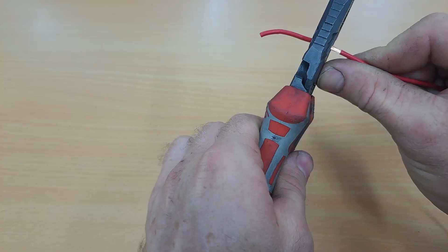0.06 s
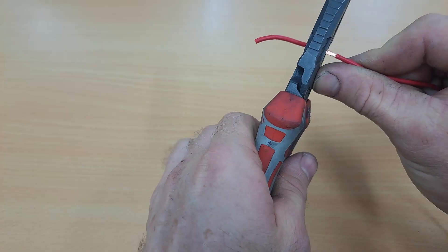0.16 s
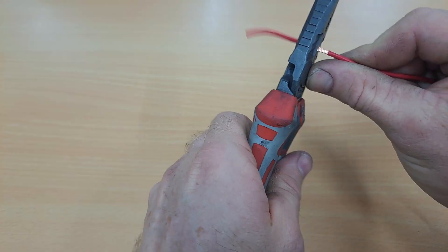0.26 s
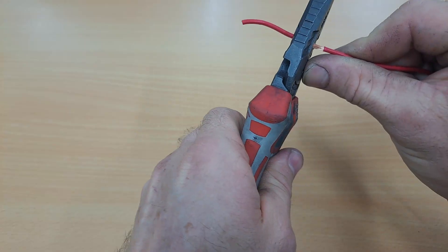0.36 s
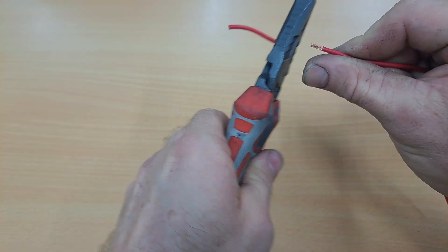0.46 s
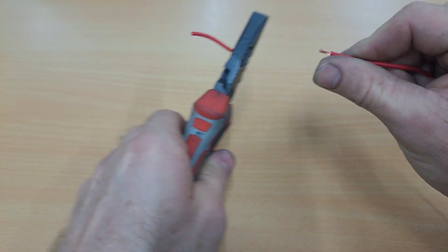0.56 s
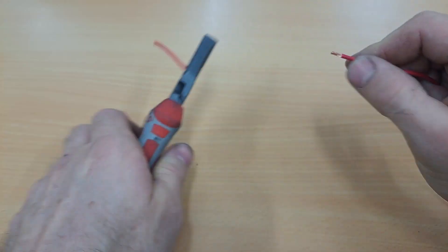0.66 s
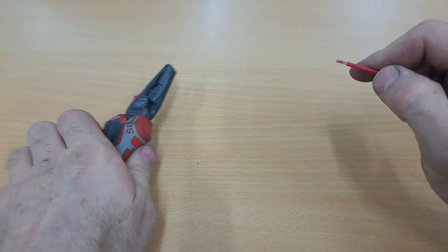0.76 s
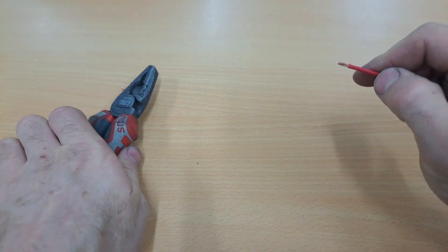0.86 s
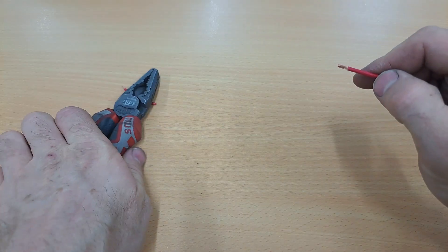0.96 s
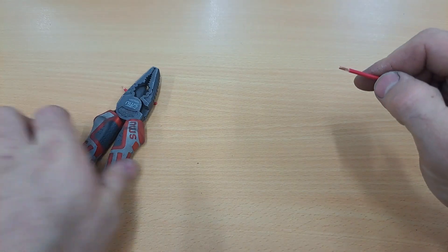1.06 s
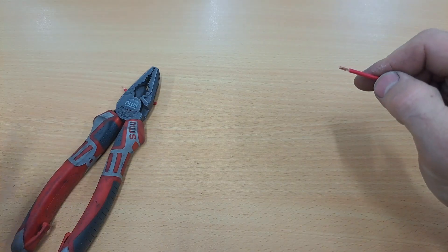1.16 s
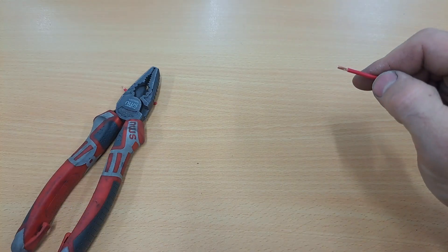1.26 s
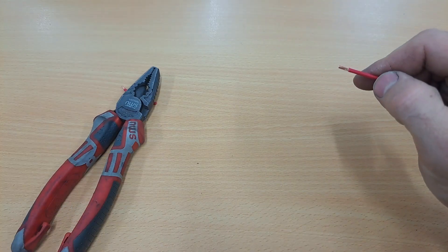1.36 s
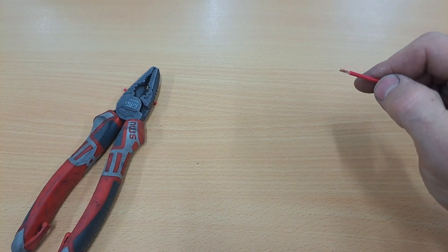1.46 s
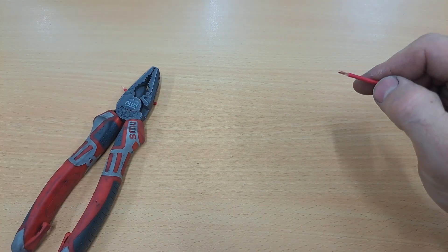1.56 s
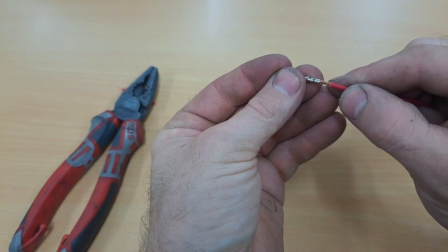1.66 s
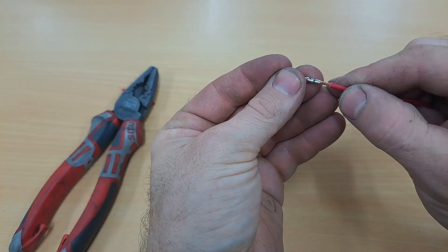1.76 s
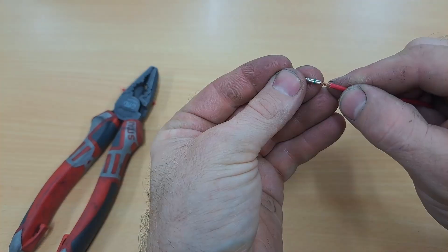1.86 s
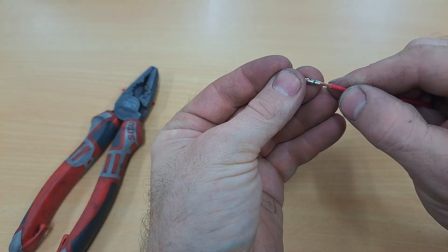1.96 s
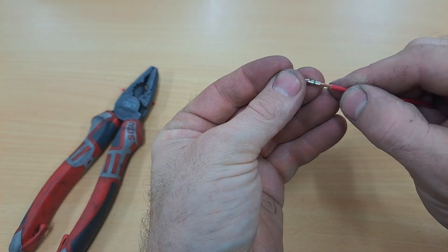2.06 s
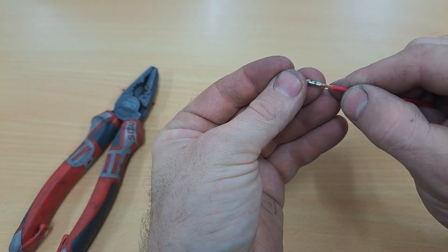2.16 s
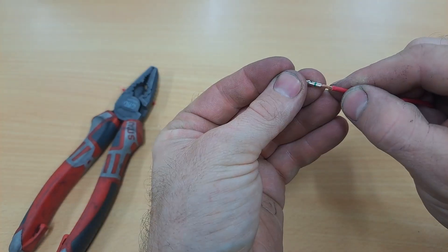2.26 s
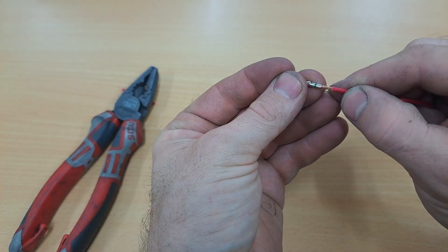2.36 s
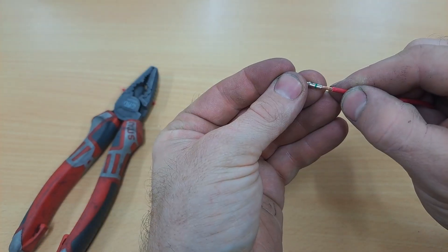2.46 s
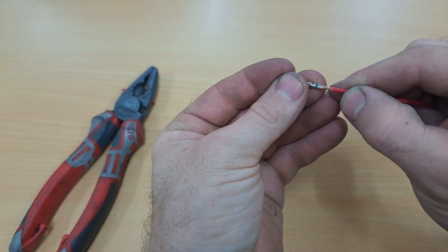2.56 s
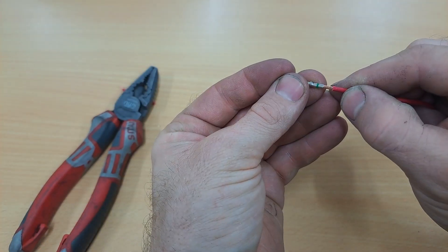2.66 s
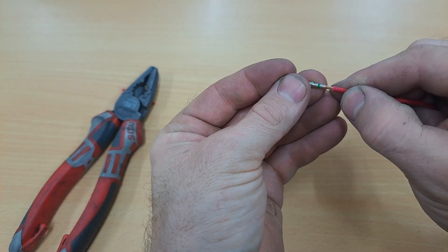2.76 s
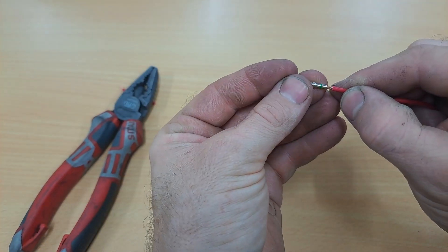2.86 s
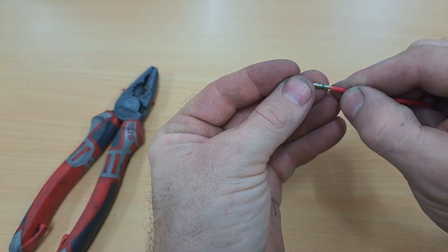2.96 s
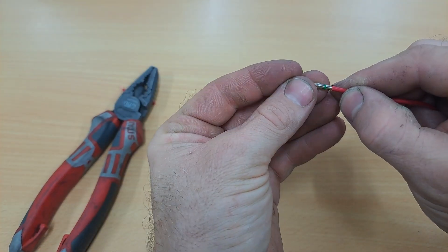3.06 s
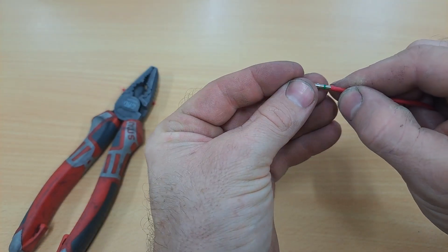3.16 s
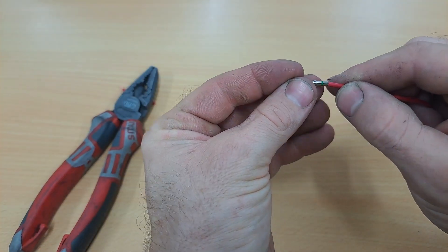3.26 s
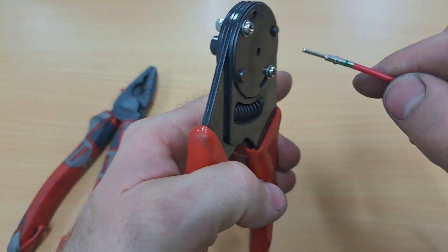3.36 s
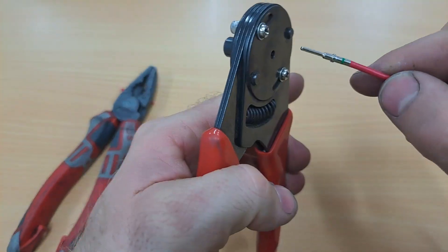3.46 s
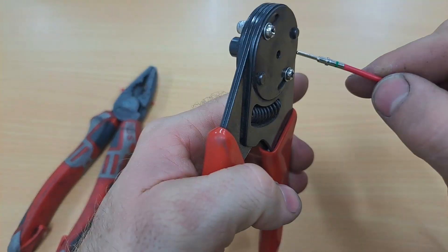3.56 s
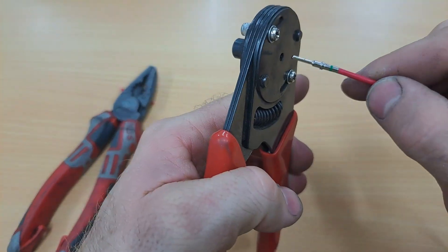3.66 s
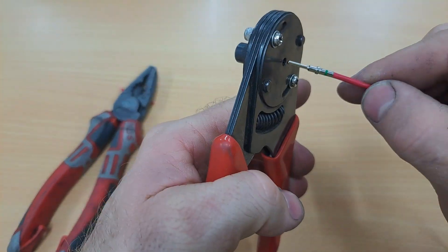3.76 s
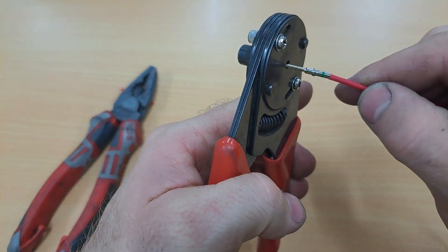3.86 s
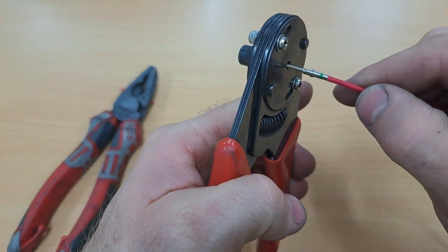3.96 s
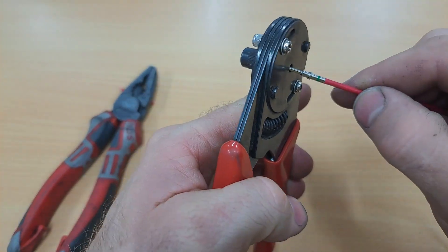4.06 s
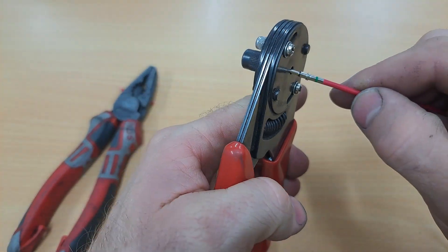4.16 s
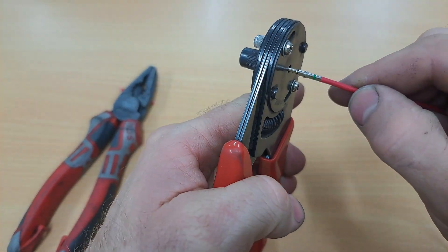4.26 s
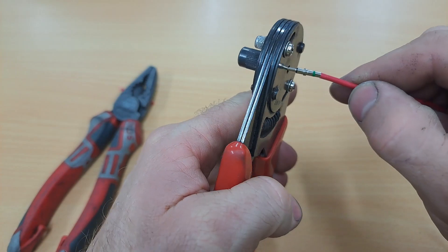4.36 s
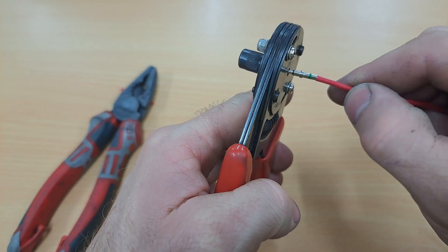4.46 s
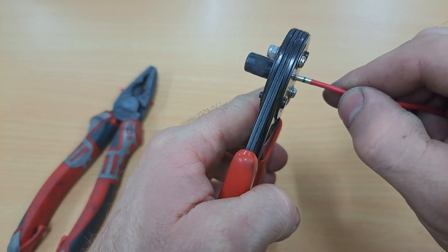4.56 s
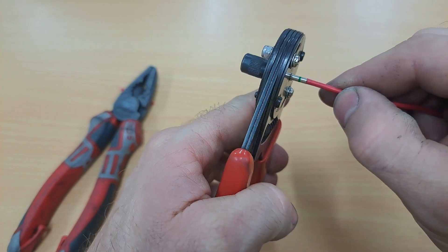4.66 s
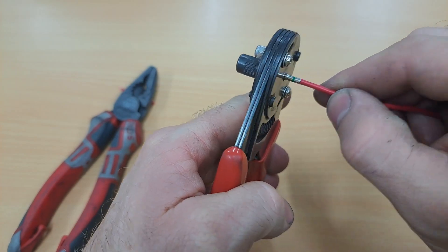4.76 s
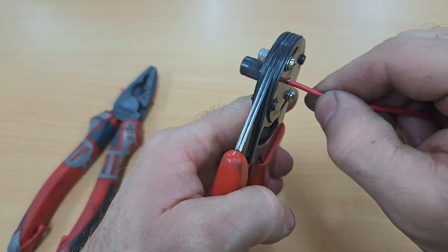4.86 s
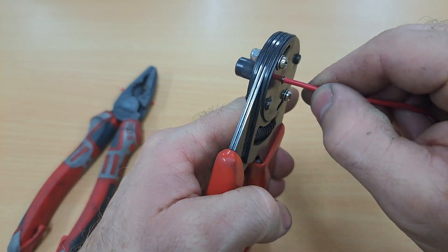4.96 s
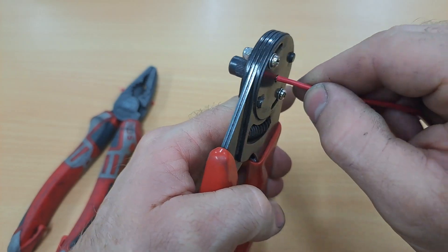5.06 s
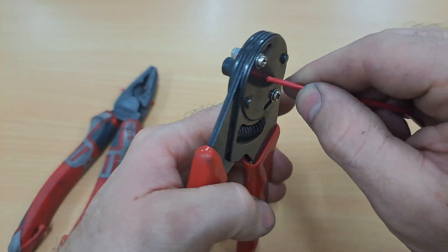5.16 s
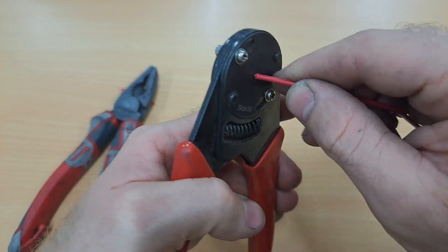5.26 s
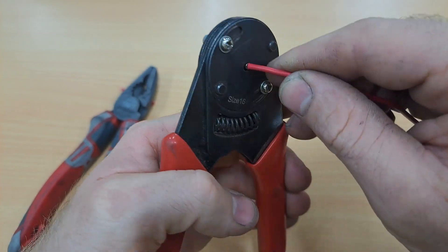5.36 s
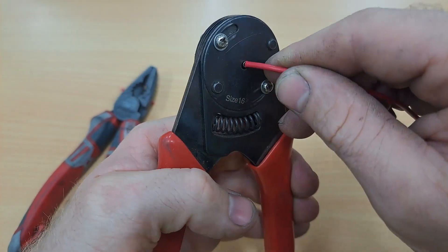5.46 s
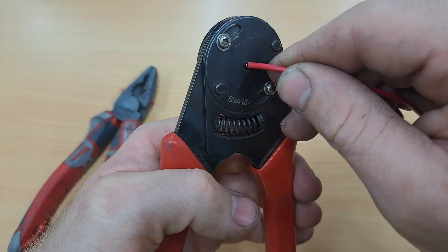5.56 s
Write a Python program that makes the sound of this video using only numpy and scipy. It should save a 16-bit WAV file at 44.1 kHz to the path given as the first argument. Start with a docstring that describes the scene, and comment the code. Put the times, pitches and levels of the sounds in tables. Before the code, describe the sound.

A steady low ventilation rumble and a faint hiss run throughout, heard through a close microphone in a bare workshop with a short echo. At about 0.3 seconds, pliers bite through wire insulation with a sharp metallic snap, and the bared strands shiver very faintly. Light ticks and rubbing follow around 0.8 seconds. From 1.0 to 1.1 seconds the pliers land on a wooden bench with a quick cluster of knocks and a metal clack, the loudest moment. Only room tone continues until about 3.4 seconds, when very faint metal scraping begins. From around 4.1 seconds a ratchet crimper ticks shut on a pin, with crisp clicks near 4.4 and 4.6 seconds and lighter ones around 4.9. A sharp click at 5.1 seconds releases it, its spring trembles briefly, and soft rubbing and small ticks trail off by about 5.6 seconds.

```python
"""Pliers and crimper at the workbench

Close up, pliers bite through wire insulation, the bared strands shiver, and the tool knocks down on a
wooden bench. Later a ratchet crimper ticks shut on a pin and its spring trembles on release. Cracks and
rubbing ring the metal of each tool. The microphone is a phone standing close by, with two unlike ports
and a faint hiss; all around, ventilation rumbles in a bare, echoing workshop."""
import sys
import numpy as np
from scipy import signal
from scipy.fft import rfft, irfft, next_fast_len
from scipy.io import wavfile
from scipy.ndimage import uniform_filter1d, minimum_filter1d

SR = 44100
rng = np.random.default_rng(int(sys.argv[2]) if len(sys.argv) > 2 else 0)


def wrap_up_sound(samples):
    """Save the sound to the file named by the first command line argument, as 16-bit audio."""
    columns = np.atleast_2d(samples).T
    # keep every value between -1 and 1, then stretch to whole-number steps
    tamed = np.clip(columns, -1, 1)
    steps = np.round(tamed * 32767).astype(np.int16)
    wavfile.write(sys.argv[1], SR, steps)


N = 247401

# Spectra of the phone's hiss and the ventilation. Each row: frequency in Hz, relative level in dB.
HISS_SPECTRUM = [(1760, -28.5), (3000, -40.5), (3330, -28), (3600, 3), (6570, 2), (7300, 4.5), (9500, -1),
                 (12000, 6), (14000, 7.5), (15500, 5), (15900, -1.5), (16150, -30)]
VENT_SPECTRUM = [(13, -64.5), (22, -37.5), (35, -24.5), (48, -3), (65, -5.5), (87, -9), (125, -0.5),
                 (191, -5.5), (263, -3.5), (362, -14), (810, -23), (980, -28), (1320, -31.5), (1890, -35),
                 (2500, -45), (3000, -58), (3500, -60), (4550, -100.5), (7700, -120)]
# The room. Each row: frequency in Hz, time to fade 60 dB in seconds, echo level in dB.
ROOM_DECAY = [(100, 0.36, -7.5), (310, 0.64, -7.5), (730, 0.46, 4), (1170, 0.97, 6.5), (1944, 0.87, 1.5),
              (3000, 0.46, 1), (4900, 0.88, -17), (7200, 0.66, -20), (9070, 1, -16.5), (12300, .4, -16.5),
              (14440, 0.29, -14.5), (16010, 0.314, -21)]
# Sound from all sides at the two ports. Each row: frequency in Hz, correlation.
PORT_LIKENESS = [(60, 1), (130, 0.97), (290, 0.88), (640, 0.11), (1410, -0.15), (3100, 0.16),
                 (6820, -0.034), (15000, 0.043)]
# Its balance. Each row: frequency in Hz, left minus right in dB.
PORT_BALANCE = [(60, -2), (110, -2), (200, -2), (380, -4), (700, -3.5), (1290, -5.5), (2380, -5),
                (4400, -8), (8120, -2.5), (15000, -3.5)]
# The ports at close range. Each row: frequency in Hz, left gain in dB, right gain in dB.
PORT_RESPONSE = [(102, -7.5, -6.5), (580, 2, 5), (1594, 10.5, 5), (3000, 1, 12), (5580, -22, -5),
                 (8900, -3, 0), (10390, 3, -16), (12600, -10, -4), (15580, -2.5, -10.5)]
# Modes of the wooden top. Each row: frequency in Hz, level in dB, time to fade 60 dB in seconds.
WOOD_MODES = [(117.3, 4, 0.19), (137.8, -8, 0.34), (203, -3.5, 0.12), (289.7, -14, 0.18), (323.6, 4, 0.043),
              (387, -4.5, 0.0633), (467, -4.5, 0.032), (556.4, -11, 0.12), (642, -6.5, 0.035),
              (760, -3.5, 0.022), (857, -2.5, 0.035), (981, -1.5, 0.03), (1180, 5.5, 0.013),
              (1294, -9, 0.03), (1502, 1.5, 0.013), (1645, -1.5, 0.011), (1853, 0, 0.025),
              (2020, -6, 0.073), (2610, -5.5, 0.02255), (3947, -17.5, .01)]
# Knocks on it. Each row: start in seconds, level in dB, contact time in seconds.
BENCH_KNOCKS = [(0.3233, -17.5, 0.0026), (0.3262, -22, 0.0021), (0.3227, -46, 0.00041),
                (0.796, -40.5, 0.00018), (0.977, 0.5, 0.0029), (1.0688, 0.5, 0.0025), (1.091, 2, 0.0036),
                (1.1039, -6.5, 0.0006), (1.1064, -12, 0.00043), (1.1099, -7, 0.00083), (1.1234, -8, 0.0011),
                (1.13, -9, 0.0015)]
# Resonances of duct, wire and tools. Each row: frequency in Hz, nominal width in Hz, level in dB.
DUCT_RESONANCES = [(58, 35.6, 1.5), (116.4, 20, -1.5), (168.7, 4.7, -7.5), (210.1, 40, -14),
                   (252.9, 5.8, -3.5), (334, 110, -5.5)]
STRAND_RESONANCES = [(2144, 170, -3), (4860, 250, -11)]
SPRING_RESONANCES = [(2980, 220, -11), (5030, 400, 3), (6850, 340, 5), (12400, 620, -3)]
PLIER_RESONANCES = [(1640, 470, 2), (2200, 460, -0.5), (2747, 450, -6), (3530, 660, -6), (3995, 800, -4.5),
                    (5090, 1300, 5), (6145, 1350, 6.5), (7170, 1000, 5), (9240, 2850, -9),
                    (11440, 1410, 2.5), (12360, 3300, -2), (14630, 3000, -12)]
CRIMPER_RESONANCES = [(1310, 1300, -9), (1930, 1300, -5), (2570, 940, -5), (3630, 370, -5),
                      (3960, 930, -13.5), (5150, 1300, -6), (6170, 1600, -1.5), (7090, 1090, 2.5),
                      (9840, 2300, -10), (11400, 1200, -3.5), (12350, 1200, -0.5), (14400, 1700, -4),
                      (15430, 1300, -5.5)]
# A tool rings in six zones. Five have their own ring level, low to high, relative to the 6-9 kHz zone.
ZONE_EDGES_HZ, REFERENCE_ZONE = [3000, 4400, 6000, 9000, 13800], 3
# Fingers, wire and jaws rubbing.
# Each row: start in seconds, hold in seconds, level in dB, five ring levels in dB.
PLIER_STROKES = [(.08, 0.22, -77, -22.5, -3.5, 0, -1, -9), (.16, .01, -62.5, -8, -10.5, 0.22, -4.5, -7),
                 (.285, 0.019, -55.5, -2, -0.5, 0, -4, 7), (.345, 0.01, -52, -7.5, -34.5, 0.076, 4, 1.5),
                 (.47, 0.085, -67.5, -22, -15, 0, -10, -1), (.6, .1, -61.5, 0, -9, 0, -6, -1),
                 (.735, 0.032, -53, -22, -15, 1, -7, -1), (.81, 0.069, -57.5, 6.5, 4.5, 0, -1, 2),
                 (.88, 0.025, -60, -7, 6, 0.069, -1, -3), (.95, 0.19, -60, 4, 7, 0.029, -2.5, -8)]
CRIMPER_STROKES = [(3.38, 0.22, -77, -19, -4, -2, -9, -9), (3.62, 0.15, -80, -13.5, -0.5, 0.5, -3, -6),
                   (3.915, 0.043, -75, -15.5, -3, 11, -6, 5.5), (4.07, 0.15, -74, -19, -6, 12.5, -6, -9),
                   (4.3, 0.19, -73, -8, -3, -4, -8, -9), (4.45, 0.021, -62, -4, 1, 12, -5, 0),
                   (4.56, 0.0068, -59, -20, -3, 9, -14, -14), (4.595, 0.027, -51, -15, 5, 5, -10, -12),
                   (4.845, 0.042, -56.5, -15, -14, 9, -5, -7), (4.885, 0.032, -69, 3, 5, 0, -7, -9),
                   (4.927, 0.0076, -50, -10, -1, 7, 0, -3), (5.135, 0.055, -54.5, -14, -8, 2, -5, -7),
                   (5.185, 0.048, -61, -10, -9, 4, -7, -9), (5.225, 0.13, -63.5, -7, -9, 1.5, -7, -13),
                   (5.33, 0.15, -62.5, -8, -3, 8, -6, -8), (5.5, .15, -66, -11, -12, 4, -9, -10)]
# Metal ticks of the pliers, and of the crimper's pin and pawl.
# Each row: start in seconds, level in dB, rattle length in milliseconds, five ring levels in dB.
PLIER_CLICKS = [(.15, -44.5, 3, -12, -1.5, -4, -8.5, -8), (.168, -50.5, 2.4, 3, -7, -1.5, -4, -2),
                (.2758, -44, 2.5, -8, -4, -5.5, 1, 1), (.3055, -48, 2.4, -5, 0.5, 0.5, -3, -0.5),
                (.3229, -11.5, 5.2, -7.5, 0.5, 0.5, 4.5, -1.5), (.5327, -48, 1.5, -1, -2, 7, -2, 16),
                (.733, -48.5, 2.4, -8.5, -6, 0, 0, -6), (.7936, -24.5, 1.3, -5, -1.5, 1, -16.5, -15),
                (.8115, -36.5, 1.8, -5, 10.5, 3, -5.5, -6), (.836, -45, 1.5, -1.5, 0.5, -5, -5, -3),
                (.8523, -27.5, 1.5, -15, -6, -4, 2, 10), (.8838, -36, 1.5, -12, -2, -1, 1, 8),
                (.9, -36.5, 1.3, -9, -6, 4, -9, -3.5), (.9052, -30, 1.8, -13.5, 2, 3, -3, -8),
                (.9105, -43, 1.5, -8, -2, 0, -5, -6), (.9665, -48, 1.5, -5, -2, -3, -8, -10),
                (.9755, -47, 4, 14, -9, 2, -16, -19), (.9915, -41, 1.2, -10, -7.5, 1, -4, -10.5),
                (.9975, -31, 2.2, -7.5, 0, 2, -16, -19.5), (1.069, -53, 2.4, 2, -5.5, -2.5, -16.5, -15),
                (1.0935, -29, 2.6, -1.5, -6, -5.5, -16, -11.5), (1.1032, -17, 3, -3, 2.5, -1.5, -7.5, -10),
                (1.105, -8, 4.4, -3.5, 3, 3.5, -5, -5), (1.1075, -20, 3.5, -3.5, -5.5, 6.5, -11, -13),
                (1.127, -27.5, 4, -8.5, 1, 6, -13.5, -15.5)]
CRIMPER_CLICKS = [(3.9115, -44, 2.1, -18, -9, 7.5, -13, 6), (4.096, -47.5, 2.2, -13, -8, 1, -12, -10),
                  (4.1205, -31.5, 5.7, -12, -18, -16, -1, -11), (4.136, -46, 2.2, 0, -3, 11, -3, -9),
                  (4.147, -48, 2.2, -3, -6, 10, -6, -9), (4.182, -41, 1.8, -10, -12, -6, 1, -8),
                  (4.186, -36.5, 2.2, -12, -11, -4, -6, -4), (4.4396, -17.5, 6.5, -23, -4, -1.5, -3.5, 2),
                  (4.468, -38, 2.2, -9, -3, -1, -3, -4), (4.6005, -31, 3.4, -27, -1, 7, -7, -7),
                  (4.606, -40, 2.2, -19, -3, -3, 6, -3), (4.6162, -12, 2, -29, -6, 5, -1, -8),
                  (4.6225, -31, 0.77, -30, -5, -4, -3, 1), (4.6252, -18.5, 6.8, -21, -10, 11, 1, -3),
                  (4.631, -33, 2.8, -29, 0, 4, 2, -3), (4.841, -30.5, 2.6, -22, -19, -8, 5.5, 5),
                  (4.8495, -36, 3, -29, -11, -6, -9, -9), (4.861, -39, 5, -25, -15, -3, -7, -9),
                  (4.8724, -34, 2.8, -18, -14, 1, -2, -6), (4.9264, -30.5, 3.4, -19, -3, 9, 8.5, -3),
                  (4.9315, -32, 3.9, -21, 0, 9, 5, 7), (4.9375, -31.5, 3.5, -19, 0, 6, 1, 0),
                  (5.1206, -15, 4.8, -11.5, -9, -1, -1.5, -10), (5.293, -51.5, 1.5, -3, -1, 1, -3, -1.5),
                  (5.3275, -37, 3.8, -20, -14, -11, -3, -9), (5.417, -39, 4, -12, -5, -2, -7, -12),
                  (5.487, -51, 2.4, -8, 0, 0, -6, -9)]

PATHS = 4  # directions in which sound leaves the bench, the first two towards the ports


def undb(db):
    """Decibels to gain."""
    return 10 ** (np.asarray(db) / 20)


def along(hz, table, column=1):
    """A table read on a log-frequency axis."""
    table = np.array(table, float)
    return np.interp(np.log(np.maximum(hz, 1)), np.log(table[:, 0]), table[:, column])


def minimum_phase(gain_db):
    """Causal response for a gain in dB."""
    cepstrum = irfft(gain_db * np.log(10) / 20)
    half = len(cepstrum) // 2
    cepstrum[1:half] *= 2
    cepstrum[half + 1:] = 0
    return np.exp(rfft(cepstrum))


def resonances(hz, modes, max_q=20):
    """One steep-sided response for each mode; damping, as by a hand on a tool, caps the Q."""
    centre, width, db = np.transpose(modes)[:, :, None]
    width = np.maximum(width, centre / max_q)
    sign = (-1.) ** np.arange(len(centre))[:, None]  # opposed neighbours leave no notch between them
    return sign * undb(db) * (1j * hz * width / (centre ** 2 - hz ** 2 + 1j * hz * width)) ** 2


def zones(modes, ring_db):
    """Zone of each mode, and the levels of all six zones."""
    zone = np.searchsorted(ZONE_EDGES_HZ, np.array(modes)[:, 0])
    return zone, np.insert(ring_db, REFERENCE_ZONE, 0, axis=0)


def diffuse(count):
    """Spectra of noise from all sides: alike at both ports in the bass, nearly unrelated above."""
    hz = np.fft.rfftfreq(count, 1 / SR)
    likeness = np.clip(along(hz, PORT_LIKENESS), -.99, .99)
    mid, side = rfft(rng.standard_normal((2, count)))
    mid, side = mid * np.sqrt((1 + likeness) / 2), side * np.sqrt((1 - likeness) / 2)
    tilt_db = along(hz, PORT_BALANCE) / 2
    return hz, np.array([(mid + side) * undb(tilt_db), (mid - side) * undb(-tilt_db)])


def circuit_hiss(level_db=-81):
    """The noise floor: smooth self-noise of the phone's circuits."""
    hz, field = diffuse(N)
    noise = irfft(field * undb(along(hz, HISS_SPECTRUM)), N)
    return noise * undb(level_db) / noise.mean(axis=0).std()


def ventilation(level_db=-36, duct_db=-2.1):
    """Room tone: a steady rumble of air from all sides, coloured by the duct's resonances."""
    hz, field = diffuse(N)
    duct_lift = 1 + undb(duct_db) * abs(resonances(hz, DUCT_RESONANCES, max_q=50)).sum(axis=0)
    noise = irfft(field * undb(along(hz, VENT_SPECTRUM)) * duct_lift, N)
    return noise * undb(level_db) / noise.mean(axis=0).std()


def workshop_echo(source, first_wall_s=.005, build_up_s=.006):
    """Bare walls return a diffuse echo, each octave dying at its own rate."""
    hz, field = diffuse(SR)
    t, echo = np.arange(SR) / SR, 0
    colour = undb(along(hz, ROOM_DECAY, column=2))
    for centre in 62.5 * 2. ** np.arange(9):
        band = np.maximum(1 - abs(np.log2(np.maximum(hz, 1) / centre)), 0)
        t60 = along(centre, ROOM_DECAY)
        fade = np.exp(-np.log(1000) * t / t60) * np.sqrt(2 * np.log(1000) / (t60 * SR))
        echo = echo + irfft(field * band * colour, SR) * fade
    onset = 1 - np.exp(-np.maximum(t - first_wall_s, 0) / build_up_s)
    return signal.fftconvolve(source[None], echo * onset)[:, :N]


def bench_knocks(detune=.04, radiate_hz=160.5):
    """Smooth pushes ring the bench top; a softer contact lasts longer and leaves the high modes still."""
    out, t = np.zeros((PATHS, N + SR)), np.arange(SR // 3) / SR
    hz, db, t60 = np.transpose(WOOD_MODES)[:, :, None]
    decay = undb(db) * np.exp(-np.log(1000) * t / t60)
    for start_s, level_db, contact_s in BENCH_KNOCKS:
        push = np.sin(np.pi * np.arange(int(contact_s * SR) + 1) / (contact_s * SR)) ** 2
        # higher modes come from patches at unlike distances from the microphone, each tuned its own way
        phase = hz / 1000 * rng.standard_normal((PATHS, len(hz), 1))
        pitch = hz * (1 + detune * np.minimum(hz / 1000, 1) ** 2 * rng.standard_normal(phase.shape))
        ring = (decay * np.sin(2 * np.pi * pitch * t + phase)).sum(axis=1)
        knock = signal.fftconvolve(ring, push[None] / push.sum())[:, :len(t)]
        i = int(start_s * SR)
        out[:, i:i + len(t)] -= undb(level_db) * knock / 2
    radiation = signal.butter(2, radiate_hz, "high", fs=SR, output="sos")  # deep bass hardly moves air
    return signal.sosfilt(radiation, out[:, :N])


def shiver(modes, start_s, level_db, fade_db_per_s, rise_s=.0099):
    """Thin metal let go trembles against its seat, sounding a few narrow modes that fade."""
    t = np.arange(SR // 2) / SR
    response = resonances(np.fft.rfftfreq(len(t), 1 / SR), modes).sum(axis=0)
    tone = irfft(rfft(rng.standard_normal((PATHS, len(t)))) * response, len(t))
    envelope = undb(level_db - fade_db_per_s * t) * (1 - np.exp(-t / rise_s))
    out, i = np.zeros((PATHS, N + SR)), int(start_s * SR)
    out[:, i:i + len(t)] = tone / tone.std() * envelope
    return out[:, :N]


def rubbing(strokes, modes, swell_db_per_s, fade_db_per_s, grain_db=2, grain_s=.0012, grip_db=2.5):
    """Dense slips of uneven size excite the tool's modes; each stroke swells, holds and dies away."""
    start_s, hold_s, level_db, *ring_db = np.transpose(strokes)[:, :, None]
    size = next_fast_len(N, True)
    t, hz = np.arange(N) / SR, np.fft.rfftfreq(size, 1 / SR)
    swell_db = swell_db_per_s * np.maximum(start_s - t, 0)
    fade_db = fade_db_per_s * np.maximum(t - start_s - hold_s, 0)
    power = undb(2 * (level_db - swell_db - fade_db))
    grain, patch = int(grain_s * SR), 900  # samples
    slip_sizes = undb(grain_db * rng.exponential(size=N // grain + 1))
    slips = np.repeat(slip_sizes, grain)[:N] * rng.standard_normal((PATHS, N))
    # the grip tightens and slackens, so the rubbing comes in patches
    grip = np.repeat(rng.standard_normal(N // patch + 1), patch)[:N]
    friction = rfft(slips * undb(grip_db * uniform_filter1d(grip, size=patch)), size)
    bank = resonances(hz, modes)
    zone, zone_db = zones(modes, ring_db)
    bands = [irfft(friction * bank[zone == k].sum(axis=0), size)[:, :N] for k in range(len(zone_db))]
    gains = np.sqrt(undb(2 * zone_db[:, :, 0]) @ power)
    return sum(gain * band for gain, band in zip(gains, bands)) / bands[REFERENCE_ZONE].std()


def ticks(events, modes, pan_db, scatter_db=1, crack_db=-2, onset_delay_s=.0007):
    """Each crack and its short rattle ring every mode by a new amount."""
    size = 2048
    out = np.zeros((PATHS + 2, N + size))  # left port, right port, then the ways to the walls
    hz, t = np.fft.rfftfreq(size, 1 / SR), np.arange(size) / SR
    bank = resonances(hz, modes)
    for start_s, level_db, rattle_ms, *ring_db in events:
        zone, zone_db = zones(modes, ring_db)
        grit = rng.standard_normal((PATHS + 3, size))
        rattle = (grit[0] + .59 * grit[1:]) * np.exp(-2000 * t / rattle_ms)  # the ports share most of it
        rattle[:, 0] += undb(crack_db) * np.linalg.norm(rattle, axis=1)  # the first touch is an impulse
        # each wall gets one clean impulse, at its own small delay
        rattle[2:] = np.arange(size) == rng.integers(0, 130, (PATHS, 1))
        mode_db = zone_db[zone] - scatter_db * rng.standard_normal(len(modes))
        ring = irfft(rfft(rattle) * (undb(mode_db) @ bank), size)
        ring = 5 * ring / np.linalg.norm(rattle, axis=1, keepdims=True)
        ring[:2] *= undb([[pan_db / 2], [-pan_db / 2]])  # positive leans left
        i = int((start_s + onset_delay_s) * SR)
        out[:, i:i + size] += ring * undb(level_db)
    return out[:, :N]


def scene():
    """Tools and bench reach the ports from close by and by way of the walls, over the room tone."""
    clicks = ticks(PLIER_CLICKS, PLIER_RESONANCES, pan_db=4)
    clicks += ticks(CRIMPER_CLICKS, CRIMPER_RESONANCES, pan_db=-2)
    near = bench_knocks()
    near += shiver(STRAND_RESONANCES, start_s=.38, level_db=-58.5, fade_db_per_s=94)
    near += shiver(SPRING_RESONANCES, start_s=5.13, level_db=-52.5, fade_db_per_s=91)
    near += rubbing(PLIER_STROKES, PLIER_RESONANCES, swell_db_per_s=400.5, fade_db_per_s=129.5)
    near += rubbing(CRIMPER_STROKES, CRIMPER_RESONANCES, swell_db_per_s=1200, fade_db_per_s=700)
    size = next_fast_len(N + SR, True) // 2 * 2
    hz = np.fft.rfftfreq(size, 1 / SR)
    ports = np.array([minimum_phase(along(hz, PORT_RESPONSE, column)) for column in (1, 2)])
    direct = irfft(rfft(near[:2] + clicks[:2], size) * ports, size)[:, :N]
    echo = sum(workshop_echo(path) for path in near + clicks[2:]) / np.sqrt(PATHS)
    return direct + echo + ventilation()


def record(dry):
    """The phone ducks at any peak over full scale, holds and lets go; it clips softly and adds hiss."""
    ratio, hold_s, top_hz = 2.8, .551, 16500
    hold = int(hold_s * SR) // 2 * 2 + 1
    held_peak = -minimum_filter1d(-abs(dry).max(axis=0), size=hold, origin=hold // 2)
    gain = np.minimum(1 / held_peak, 1) ** (1 - 1 / ratio)
    gain = uniform_filter1d(gain, size=200)
    top_cut = signal.ellip(10, .2, 70, top_hz, fs=SR, output="sos")
    return signal.sosfilt(top_cut, np.tanh(dry * gain) + circuit_hiss())


dry = scene()
out = record(dry)
wrap_up_sound(out)
```